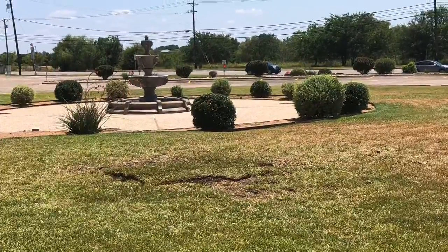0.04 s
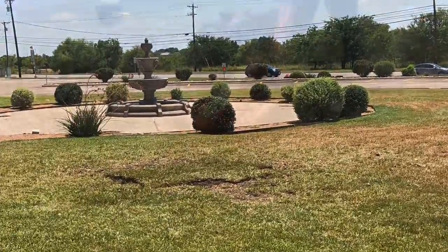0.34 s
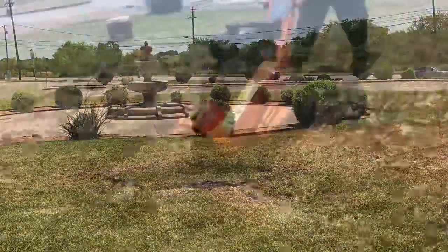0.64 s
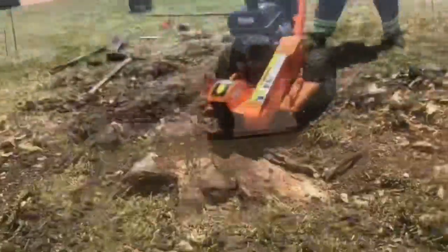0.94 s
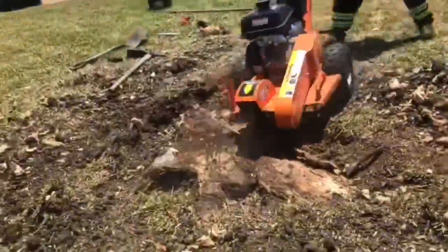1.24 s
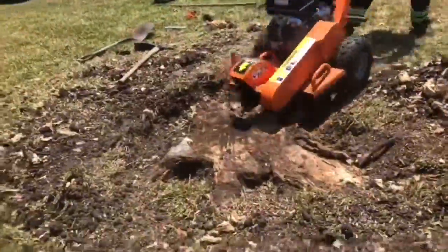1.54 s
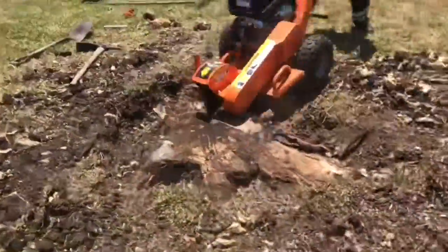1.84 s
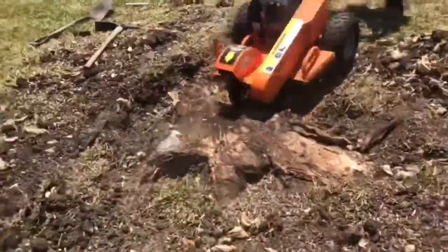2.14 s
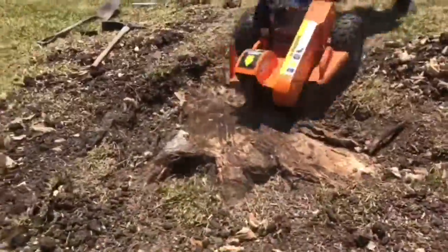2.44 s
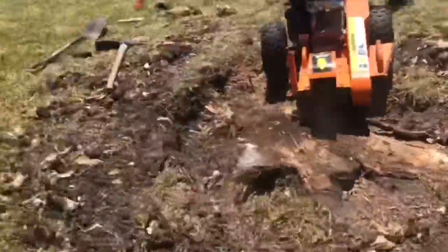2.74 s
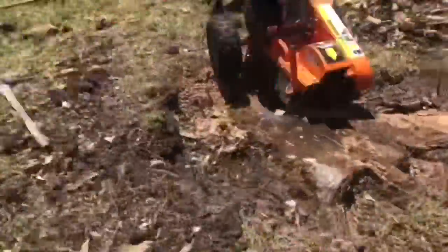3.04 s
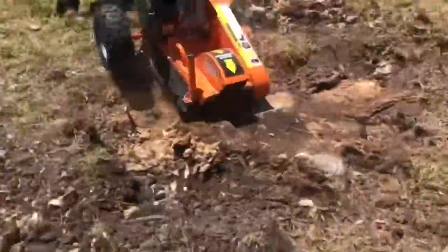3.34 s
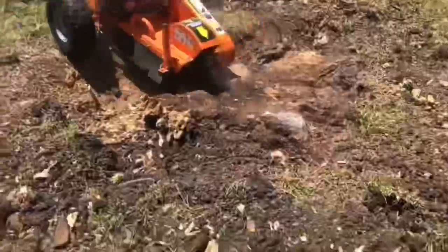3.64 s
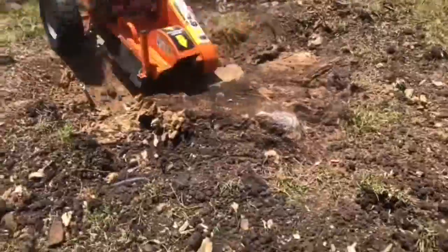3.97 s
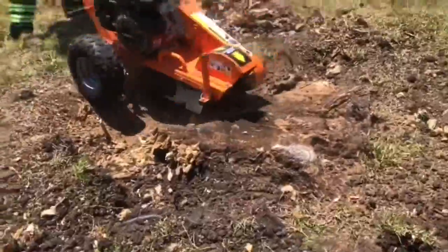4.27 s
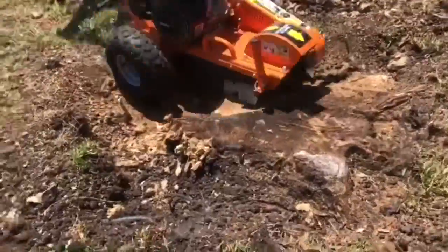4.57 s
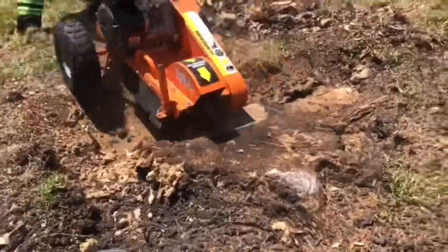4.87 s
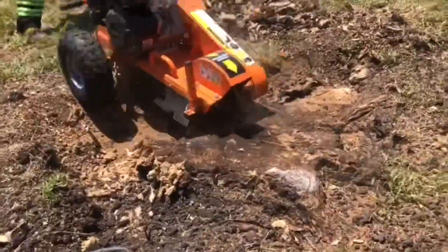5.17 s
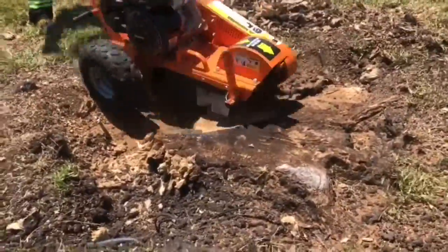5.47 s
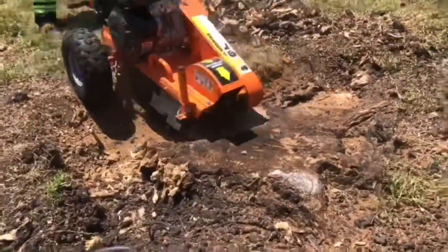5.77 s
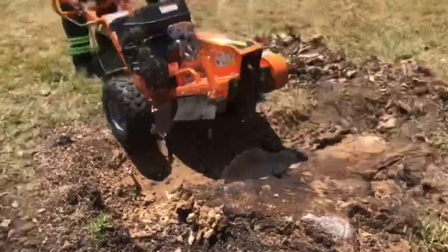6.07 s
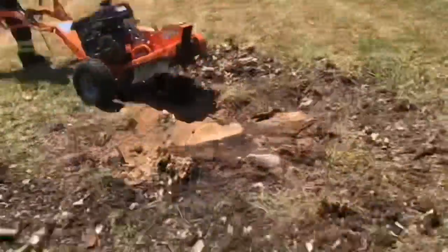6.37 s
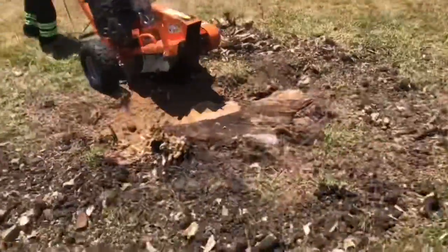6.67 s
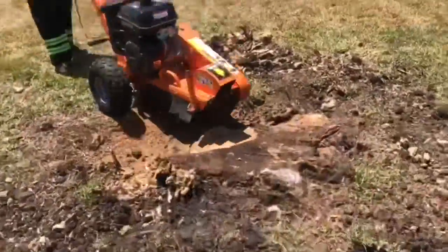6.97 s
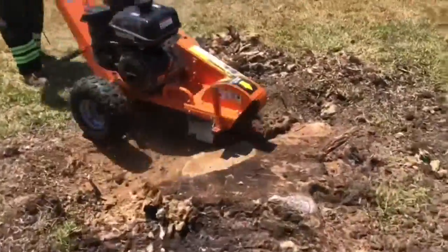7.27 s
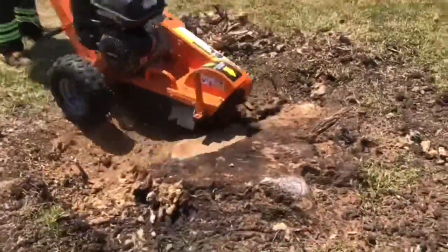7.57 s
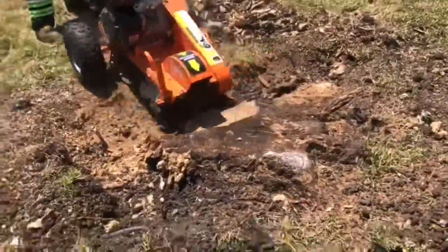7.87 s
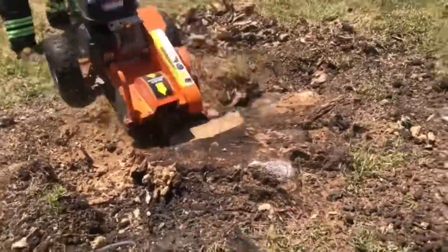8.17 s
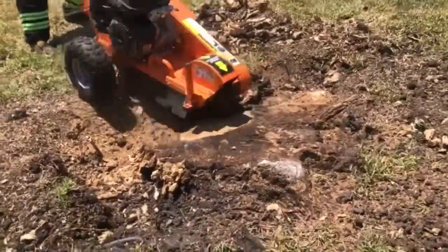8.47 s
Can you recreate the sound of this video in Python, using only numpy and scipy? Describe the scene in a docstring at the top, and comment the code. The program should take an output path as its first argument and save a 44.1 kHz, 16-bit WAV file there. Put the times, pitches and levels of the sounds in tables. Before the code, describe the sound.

A petrol stump grinder buzzes close by, its engine sagging as the cutter chews wood with hissing chips and brief squeals.

```python
"""A petrol stump grinder sweeps its cutter wheel to and fro over a stump, outdoors, close to a mono mic.
The engine's exhaust pulses make a buzzing note that sags whenever the teeth bite. Chips hiss against
the steel guard, the teeth ring and squeal in the wood, the wheel sings and the ground rumbles below.
Around six seconds the wheel lifts out of the cut and throws up soil and clods.
The sound fades in at the start."""
import sys
import numpy as np
from scipy import signal
from scipy.fft import rfft, irfft, next_fast_len
from scipy.io import wavfile
from scipy.ndimage import map_coordinates

SR = 44100
rng = np.random.default_rng(int(sys.argv[2]) if len(sys.argv) > 2 else 0)


def transcribe(u):
    """Save the signal u as a 16-bit wav file named by the first command-line argument.

    u: samples, shape (n,) or (channels, n), limited to [-1, 1]; the rate is SR.
    q: integer samples, one column per channel.
    """
    v = np.clip(np.atleast_2d(u).T, -1, 1)
    q = np.round(v * 32767).astype(np.int16)
    wavfile.write(sys.argv[1], SR, q)


N = 379701

# Levels in the tables are relative: each source adds its own gain.
# low and high engine harmonics: (multiple of the pulse rate, level [dB], gain with speed [dB/Hz])
DRONE_HARMONICS = [(1, -29, 0), (2, 0, -0.19), (3, 0, 0)]
WHINE_HARMONICS = [(4, -13, .9), (5, 0, 0), (6, -8.5, .5), (7, -15, 0), (8, -6.5, -.25), (9, -14, .7),
                   (10, -18, .3), (11, -18, 0), (12, -20, 0)]
# engine note between digs: (time [s], level [dB])
NOTE_LEVELS = [(2.2, -32.5), (5.0, -30.5), (6.6, -30.5), (7.3, -35.5), (8.6, -33)]
# spectra of shaking ground, thrown soil, grit and wood chips: (frequency [Hz], level [dB])
RUMBLE_SPECTRUM = [(15, -12), (50, 1), (95, -4), (124, 2), (160, -3), (250, 0.5), (500, -10), (1500, -40)]
SOIL_SPECTRUM = [(120, -44), (220, -23.5), (310, -7), (420, 2.5), (800, 5), (1200, 3), (1800, -10.5),
                 (3000, -33), (6000, -40)]
GRIT_SPECTRUM = [(150, -50), (500, -31), (1100, 1), (1700, 4.5), (2400, 2), (3000, -0.5), (4500, -6.5),
                 (8000, -14), (15000, -30)]
CHIP_SPECTRUM = [(1500, -31.5), (2900, -6.5), (3400, 0.5), (4500, 3.5), (5500, 0.5), (6300, -4), (7500, -5),
                 (10000, -4), (13000, -4.5), (15700, -5)]
# the wheel digs into the soil round the stump:
# (start [s], length [s], soil [dB], grit [dB], swell of the engine note [dB])
SOIL_DIGS = [(0.62, 0.1, -28, -28.5, -3), (0.818, 0.59, -34, -41, 4), (1.446, 0.35, -32.2, -44, 3.5),
             (2.397, 0.53, -29, -26.5, 5.0), (2.996, 0.75, -38.9, -30.5, -0.2),
             (3.563, 0.15, -34, -28, 3.5), (3.666, 0.44, -27, -27, 4.5), (4.114, 0.31, -31.5, -27, 4),
             (5.33, 0.44, -39, -33.5, 2.5), (5.813, 0.16, -27.5, -33, 3), (6.005, 0.16, -23.2, -29, -2),
             (6.162, 0.39, -22, -23.5, 1), (6.519, 0.32, -25.5, -29.5, 4), (7.45, 0.27, -30.5, -32, 5)]
# clods and splinters hitting the guard: (time [s], level [dB], extra level of the thud [dB])
CLOD_HITS = [(0.712, -0.5, -27), (1.064, -13, -12), (2.44, -9, -10), (3.795, -8, -9), (4.053, -9, -7),
             (4.069, -7, -3), (6.025, 1.5, -7.5), (6.078, -13, 1), (6.112, -4, -12), (6.176, -0.5, -16),
             (6.189, -6, -12), (6.217, -1.5, -24), (6.238, 3, -23), (6.25, -1, -20), (6.262, 3.5, -18),
             (6.275, -2, -5.5), (6.319, -5, -4), (6.329, -4.5, -5), (6.428, -5.5, 3.5), (6.462, -4, -4),
             (6.496, -1.5, -13), (6.755, -9, -6), (6.787, -11, -9), (6.823, -10, -7)]
# each push of the wheel into the stump: (start [s], length [s], sag of the pulse rate at first [Hz],
# sag at the end [Hz], chip hiss [dB], rubbing [dB], ground rumble [dB])
WOOD_BITES = [(0.168, 0.088, 2.4, 11.5, -28, -26, -58), (0.385, 0.21, 8.6, 10, -23.5, -28, -55.0),
              (0.715, 0.247, 10.5, 9, -21, -32, -51.5), (1.068, 0.293, 10.4, 12, -21, -30.4, -51),
              (1.44, 0.0049, 0.5, 0.0, -18.5, -40.4, -63.0), (1.505, 0.26, 9.3, 7.5, -21.5, -34, -56),
              (1.817, 0.33, 7.54, 10.0, -24.5, -23.5, -61.2), (2.191, 0.18, 5.4, 13.5, -22, -31, -62),
              (2.392, 0.14, 11, 10, -20.5, -23, -55), (2.579, 0.26, 10.07, 11, -22.5, -37.9, -54.7),
              (2.985, 0.26, 10.1, 6.5, -24, -26, -54), (3.254, 0.5, 10.7, 11.5, -23.5, -24.5, -54.5),
              (3.812, 0.069, 7.45, 11, -22, -26.5, -55.1), (3.996, 0.43, 8.8, 12, -22, -25.5, -52.5),
              (4.478, 0.38, 9.2, 8.2, -24.3, -24, -61), (4.906, 0.44, 9.9, 10, -23.5, -24.5, -63),
              (5.411, 0.292, 8.85, 7, -20.5, -27.5, -56), (5.761, 0.2, 0.42, 4, -23, -40.5, -64),
              (6.047, 0.599, 3.53, 2.5, -48, -40, -65), (6.478, 0.028, 9.6, 13.5, -44, -39.3, -61.9),
              (6.951, 0.22, 3.3, 5.5, -32, -27.3, -59), (7.051, 0.1, 3.6, 8, -26.5, -31.5, -55.0),
              (7.154, 0.15, 0.4, 8, -23.3, -23, -59.5), (7.43, 0.15, 7.4, 9.5, -22.5, -22.0, -53.3),
              (7.599, 0.11, 8.7, 9.4, -25.5, -21, -60), (7.846, 0.12, 4.27, 9.5, -27.5, -22, -58),
              (8.031, 0.15, 5.2, 7, -25.5, -27, -63), (8.185, 0.14, 7.4, 8, -26, -21.5, -55),
              (8.391, 0.17, 8.5, 11.5, -25, -20.5, -59)]
# the wheel skips clear of the wood: (start [s], length [s, sign ignored], drop in cutting noise [dB])
WHEEL_SKIPS = [(0.34, 0.039, 4), (0.678, 0.05, 3), (1.032, 0.032, 7), (1.806, 0.074, 5), (2.159, -0.046, 5),
               (2.524, 0.064, 5), (2.917, 0.06, 5), (3.257, 0.046, 5), (3.931, 0.054, 2.3),
               (4.536, 0.047, 0.5), (5.453, 0.063, 3), (7.396, 0.035, 3.8), (7.77, 0.041, 7.5),
               (8.358, 0.072, 3.5)]
# the steel wheel is set singing: (start [s], length [s], level [dB])
WHEEL_RINGS = [(2.78, 0.081, -28), (3.05, 0.21, -32.5), (3.55, 0.351, -33.5), (4.58, 0.1, -26.5),
               (4.92, 0.39, -34), (5.54, 0.11, -27.5), (7.12, 0.14, -37), (7.95, .17, -37),
               (8.46, .12, -34)]
# a tooth catches and squeals: (start [s], length [s], multiple of the pulse rate, level [dB])
TOOTH_CATCHES = [(.392, .04, 21.3, -19), (0.726, .032, 21.7, -16), (1.012, .02, 25, -20),
                 (1.012, 0.017, 29.2, -20), (1.078, 0.024, 21.2, -17), (1.415, 0.024, 16.3, -17),
                 (1.415, 0.022, 24.8, -20), (1.89, .03, 21.3, -21), (2.233, .02, 21.4, -15),
                 (2.594, 0.023, 21, -14.5), (3.115, 0.14, 21, -18.5), (3.788, 0.063, 20.7, -22),
                 (4.32, 0.08, 24.5, -20), (4.486, 0.017, 20.6, -13.5), (4.8, 0.022, 20.9, -18),
                 (6.958, 0.044, 21.2, -13), (7.02, .097, 12.5, -30), (7.04, 0.066, 20.9, -19.5),
                 (7.175, 0.024, 8.1, -20), (7.444, 0.05, 21, -21), (7.734, 0.05, 21, -23),
                 (7.843, .068, 21, -12.5), (7.94, .055, 21.2, -21), (8.045, .055, 20.8, -13.5),
                 (8.19, .1, 21, -12), (8.29, .095, 20.7, -15.5), (8.385, 0.056, 20.7, -20.5),
                 (8.501, 0.046, 21.5, -19)]
# modes of the teeth: (frequency [Hz], width [Hz], level [dB])
TOOTH_MODES = [(4020, 130, -6), (4180, 95, -2), (4335, 130, -3), (4480, 900, -4), (4820, 100, -9)]
# how the machine faces the mic: (time [s], share of the belt side, share lifted out of the cut)
MIC_ASPECT = [(0, 0.91, 0), (2.9, 0.93, 0.0094), (3.03, 0.037, 0.029), (5.98, 0.04, 0.046),
              (6.1, 0.057, 0.97), (6.88, 0, 0.89), (7, 0, 0.2), (8.61, 0, 0.19)]
# resonances of the guard as the mic hears them:
# (frequency [Hz], width [Hz], boost from the belt side [dB], from the open side [dB], when lifted [dB])
GUARD_MODES = [(3104, 200, -2.5, -7, -15), (3241, 93, 7, 13.5, 8), (3420, 100, -5, 1, -14),
               (3710, 510, -1.5, 4, 0), (4905, 69, 10, 2, -16), (5170, 300, -5.5, 1.5, 9),
               (5755, 200, 2.5, 6, 11.5), (6140, 120, 2.5, 6.5, 8), (6530, 350, 10, 0.5, 7),
               (7040, 270, 13, 4.5, 7), (8020, 540, 6.5, 4.5, 6.5), (8650, 570, 1, 5, 5),
               (9380, 550, 4, 10, 3), (10530, 210, 8, 6.5, 6.5), (11690, 670, 10.5, -1, 2),
               (12560, 400, 4, 5.5, 10), (14100, 650, 1.5, 6.5, 1)]
# flecks of single chips, lingering steel overtones, drift of colour: (width [Hz], life [s], depth [dB])
CHIP_PATCHES = [(110, .035, 2.2), (60, .3, 1.9), (900, .09, 1.2)]

FREE_HZ, CRUISE_HZ = 207.4, 200  # the engine's pulse rate with no load, and at work
SAG_S, RECOVER_S = 0.03, 0.069  # the engine slows at once and picks up more slowly
OVERSHOOT, GOVERNOR_S = 0.2, 0.04007  # extra share of the sag until the governor opens the throttle
DIG_RISE_S, DIG_FALL_S = 0.018, 0.02
SPRAY_GROWS_DB = 3.5  # more chips fly as the wheel sinks in
CATCH_DB, CATCH_S = 2, 0.038  # the teeth rub hardest as they first catch
TOP_HZ = 15750  # upper edge of the band


def amp(db):
    """Decibels to gain."""
    return 10 ** (np.asarray(db) / 20)


def unit(x):
    """Scale to rms 1."""
    return x / np.sqrt(np.mean(x ** 2) + 1e-20)


def curves(rows):
    """One value per sample for each column after the time."""
    times, *columns = np.transpose(rows)
    return [np.interp(np.arange(N) / SR, times, column) for column in columns]


def wobble(rate):
    """A smooth random curve, rate knots a second."""
    samples = np.arange(0, N + 32, 32)
    knots = rng.standard_normal(int(N * rate / SR) + 4)
    smooth = map_coordinates(knots, [samples * rate / SR], order=2)
    return np.interp(np.arange(N), samples, smooth)


def progress(start, length):
    """How far an event has got, 0 to 1."""
    return np.clip((np.arange(N) / SR - start) / max(length, 1e-3), 0, 1)


def gate(start, length, rise_s, fall_s):
    """Attack, hold and release of one event, 0 to 1."""
    t = np.arange(N) / SR - start
    return np.clip(t / rise_s, 0, 1) * np.clip(1 + (abs(length) - t) / fall_s, 0, 1)


def level(events, rise_s, fall_s, rest_db):
    """Level in dB of (start [s], length [s], level [dB]) events on top of a resting level."""
    power = np.full(N, amp(rest_db) ** 2)
    for start, length, db in events:
        power += (amp(db) * gate(start, length, rise_s, fall_s)) ** 2
    return 10 * np.log10(power)


def filtered(x, response):
    """x through a response given as a function of frequency."""
    size = next_fast_len(N + 8192, True)
    return irfft(rfft(x, size) * response(np.fft.rfftfreq(size, 1 / SR)), size)[:N]


def shape(points, hz):
    """Gain at hz, from (frequency [Hz], level [dB]) points on a log axis."""
    point_hz, db = np.transpose(points)
    return amp(np.interp(np.log(hz + 1), np.log(point_hz), db))


def coloured(x, points):
    """x shaped by the given spectrum, at rms 1."""
    return unit(filtered(x, lambda hz: shape(points, hz)))


def resonant(x, centre_hz, width_hz):
    """x through a steep-sided resonance, at rms 1."""
    def response(hz):
        damping = 1j * hz * width_hz
        return (damping / (centre_hz ** 2 - hz * hz + damping)) ** 2
    return unit(filtered(x, response))


def noise_band(centre_hz, width_hz):
    """A resonance driven by noise, at rms 1."""
    return resonant(rng.standard_normal(N), centre_hz, width_hz)


def spray(rate, spread_db, dust):
    """Tiny impacts of uneven size, rate a second, over a haze of dust."""
    hits = (rng.random(N) < rate / SR) * rng.choice([-1, 1], N)
    sizes = amp(spread_db * rng.uniform(-1, 1, N))
    return unit(unit(hits * sizes) + dust * rng.standard_normal(N))


def throb(phase, depth_db, sharp_db):
    """A gain of rms 1 that swings once a pulse by depth_db and twice a pulse by sharp_db."""
    return unit(amp(depth_db * np.cos(phase) + sharp_db * np.cos(2 * phase)))


def patchy(x, patches):
    """x with random patches of gain in pitch and time, at rms 1."""
    frames = signal.stft(x, nperseg=1024)[2]
    frame_times = np.arange(frames.shape[1]) * 512 / SR
    hz, t = np.meshgrid(np.fft.rfftfreq(1024, 1 / SR), frame_times, indexing="ij")
    gain_db = 0
    for width, life, db in patches:
        knots = rng.standard_normal((int(SR / 2 / width) + 2, int(t.max() / life) + 2))
        gain_db += db * map_coordinates(knots, [hz / width, t / life], order=1)
    return unit(signal.istft(frames * amp(gain_db), nperseg=1024)[1][:N])


def ground_rumble():
    """Far below the rest, the ground shakes with each bite."""
    shakes = [(start, length, db) for start, length, *_, db in WOOD_BITES]
    shake_db = level(shakes, rise_s=0.02, fall_s=0.059, rest_db=-66)
    return amp(shake_db + 2.9 * wobble(20)) * coloured(rng.standard_normal(N), RUMBLE_SPECTRUM)


def earth(phase):
    """Soil drums and grit rattles on the housing in step with the machine, hardest during a dig."""
    digs = np.array(SOIL_DIGS)
    clumps_db = 2.5 * wobble(22)
    soil_db = level(digs[:, [0, 1, 2]], DIG_RISE_S, DIG_FALL_S, rest_db=-37) + clumps_db - 0.85
    grit_db = level(digs[:, [0, 1, 3]], DIG_RISE_S, DIG_FALL_S, rest_db=-32) + clumps_db - 0.93
    soil = spray(rate=1400, spread_db=4.5, dust=0.72) * throb(phase, depth_db=0, sharp_db=3.5)
    soil *= amp(1.7 * wobble(90))
    grit = spray(rate=2000, spread_db=7.5, dust=0.78) * throb(phase, depth_db=0.5, sharp_db=4)
    grit *= amp(1.7 * wobble(60))
    return amp(soil_db) * coloured(soil, SOIL_SPECTRUM) + amp(grit_db) * coloured(grit, GRIT_SPECTRUM)


def clods(attack_s=0.002, t60_s=0.057):
    """Each clod bursts on the guard with a thud and a short crunch."""
    thud_gain, crunch_gain = np.zeros(N), np.zeros(N)
    t = np.arange(SR // 5) / SR
    burst = (1 - np.exp(-t / attack_s)) * amp(-60 * t / t60_s)
    for start, db, thud_db in CLOD_HITS:
        span = slice(round(start * SR), round(start * SR) + len(t))
        crunch_gain[span] += amp(db - 10) * burst
        thud_gain[span] += amp(db + thud_db - 6.5) * burst
    thuds = thud_gain * noise_band(centre_hz=447, width_hz=530)
    crunches = crunch_gain * coloured(spray(rate=4000, spread_db=3.5, dust=0.35), GRIT_SPECTRUM)
    return filtered(thuds, lambda hz: shape(SOIL_SPECTRUM, hz)) + crunches


def engine_speed():
    """Pulse rate in Hz: every bite drags the engine down and the governor wins part of it back."""
    speed = FREE_HZ + 0.693 * wobble(13)  # the speed hunts a little
    for start, length, first_hz, last_hz, *_ in WOOD_BITES:
        sag_hz = first_hz + (last_hz - first_hz) * progress(start, length)
        jolt = 1 + OVERSHOOT * (1 - progress(start + SAG_S, GOVERNOR_S))
        speed -= sag_hz * jolt * gate(start, length, SAG_S, RECOVER_S)
    return speed


def partials(harmonics, phase, speed, jitter, flutter_db):
    """Harmonics of the engine note; the higher ones are the less steady."""
    out = np.zeros(N)
    for k, db, slope in harmonics:
        unsteady = jitter * k * wobble(70)
        smear = k * k * np.pi / 7  # the muffler delays each harmonic differently: pulses become a buzz
        gain = amp(db + slope * (speed - CRUISE_HZ) + flutter_db * wobble(45))
        out += gain * np.cos(k * phase - smear + unsteady)
    return np.sqrt(2) * out


def engine(phase, speed):
    """Drone, whine and the rasp of pulses in the muffler shell; the last two grow as it labours."""
    note_db, = curves(NOTE_LEVELS)
    swells = [db * gate(start, length, DIG_RISE_S, DIG_FALL_S) for start, length, *_, db in SOIL_DIGS]
    swell_db = np.max(swells, axis=0)
    sag_hz = CRUISE_HZ - speed
    whine_db = note_db + swell_db + 0.09 * sag_hz + 0.62 * wobble(11)
    drone_db = note_db - 12 + 1.52 * swell_db
    rasp_db = whine_db - 7.5 + 1.4 * np.clip(sag_hz, -8, 2)
    drone = amp(drone_db) * partials(DRONE_HARMONICS, phase, speed, jitter=0.04, flutter_db=0.9)
    whine = amp(whine_db + 0.3) * partials(WHINE_HARMONICS, phase, speed, jitter=0.03, flutter_db=1.6)
    puffs = rng.standard_normal(N) * throb(phase, depth_db=6, sharp_db=3)
    rasp = amp(rasp_db) * resonant(puffs, centre_hz=1614, width_hz=88)
    return drone + whine + rasp


def singing_wheel():
    """The steel wheel sings in one narrow mode, fainter with the belt side towards the mic."""
    belt, _ = curves(MIC_ASPECT)
    ring_db = level(WHEEL_RINGS, rise_s=0.019, fall_s=0.063, rest_db=-41.5)
    gain = amp(ring_db + 0.2 - 4.6 * belt + 0.7 * wobble(12))
    return gain * noise_band(centre_hz=2234, width_hz=50)


def cutting_levels():
    """Chip spray and rubbing in dB: both follow the bites, vary with the grain and drop at each skip."""
    sprays, rubs = [], []
    for start, length, _, _, hiss_db, rubbing_db, _ in WOOD_BITES:
        sprays.append((start, length, hiss_db + SPRAY_GROWS_DB * (progress(start, length) - 0.5)))
        rubs.append((start, length, rubbing_db + CATCH_DB * (1 - progress(start, CATCH_S))))
    skip_db = sum(db * gate(start, length, 0.014, 0.014) for start, length, db in WHEEL_SKIPS)
    contact_db = 0.64 * wobble(16) - skip_db
    spray_db = level(sprays, rise_s=0.021, fall_s=0.17, rest_db=-24.5)  # loose chips fly between bites
    rub_db = level(rubs, rise_s=0.006, fall_s=0.12, rest_db=-37)
    return spray_db + contact_db + 0.24, rub_db + contact_db + 1.34 * wobble(22) + 0.46


def squeals(speed):
    """Now and then a tooth catches and locks into a short tone that glides with the wheel's speed."""
    out = np.zeros(N)
    waver_hz = 16 * wobble(300)
    flutter = amp(1.1 * wobble(160))
    for start, length, multiple, db in TOOTH_CATCHES:
        span = slice(int(start * SR), int((start + length) * SR) + 2)
        along = np.linspace(0, 1, len(out[span]))
        hz = multiple * speed[span] + waver_hz[span]
        swell = np.minimum(1, along / 0.081) * np.minimum(1, (1 - along) / 0.49)
        out[span] += amp(db) * swell * flutter[span] * np.sin(2 * np.pi * np.cumsum(hz) / SR)
    return out


def sizzle(speed, spray_db):
    """The tooth tips sizzle high just after a bite slows the engine, lower once the cut is steady."""
    _, lifted = curves(MIC_ASPECT)
    t = np.arange(N) / SR
    slowing_hz = np.interp(t - 0.15, t, speed) - np.interp(t - 0.04, t, speed)
    bite = np.clip(slowing_hz / 4, 0, 1)
    high = amp(-12) * bite * noise_band(centre_hz=14160, width_hz=330)
    low = amp(-15) * (1 - bite) * noise_band(centre_hz=13100, width_hz=520)
    return (1 - lifted) * amp(spray_db + 3.8 * wobble(25)) * (high + low)


def ringing_teeth(rub_db):
    """Rubbing in the wood sets the modes of the teeth ringing in fitful bursts."""
    ring = sum(amp(db + 2.5 * wobble(12)) * noise_band(hz, width) for hz, width, db in TOOTH_MODES)
    return amp(rub_db) * unit(amp(2 * wobble(70)) * ring)


def chips(phase, spray_db):
    """Chips spray against the guard, close up; its resonances change with the side facing the mic."""
    belt, lifted = curves(MIC_ASPECT)
    open_side = np.clip(1 - belt - lifted, 0, 1)
    impacts = spray(rate=8000, spread_db=4, dust=1) * throb(phase, depth_db=0.5, sharp_db=0.5)
    impacts = patchy(impacts, CHIP_PATCHES)
    impacts *= amp(spray_db + 0.4 + 0.15 * wobble(40) + 1.09 * wobble(260))
    out = np.zeros(N)
    grid_hz = np.linspace(0, SR / 2, 2048)
    for side, share in enumerate([belt, open_side, lifted]):
        boost_db = sum(boosts[side] * 0.5 ** ((2 * (grid_hz - centre) / width) ** 2)
                       for centre, width, *boosts in GUARD_MODES)
        gain = unit(shape(CHIP_SPECTRUM, grid_hz) * amp(boost_db) * (grid_hz < TOP_HZ))
        out += np.sqrt(share) * filtered(impacts, lambda hz: np.interp(hz, grid_hz, gain))
    return out


def scene():
    """The grinder from close by in the open air; one microphone feeds both channels."""
    speed = engine_speed()
    phase = 2 * np.pi * np.cumsum(speed) / SR
    spray_db, rub_db = cutting_levels()
    cutter = chips(phase, spray_db) + sizzle(speed, spray_db)
    cutter += ringing_teeth(rub_db) + squeals(speed) + singing_wheel()
    grinder = cutter + engine(phase, speed) + ground_rumble() + earth(phase) + clods()
    fade_in = progress(start=0.16, length=0.96) ** 1.066
    fade_in *= progress(start=0.17, length=0.0088)  # a short silence first
    return np.array([fade_in * grinder] * 2)


def record(dry, ceiling=0.9):
    """The microphone chain rounds off the highest peaks and passes nothing above its band limit."""
    rounded = dry / (1 + np.abs(dry / ceiling) ** 8) ** (1 / 8)
    return np.array([filtered(channel, lambda hz: hz < TOP_HZ) for channel in rounded])


dry = scene()
out = record(dry)
transcribe(out)
```